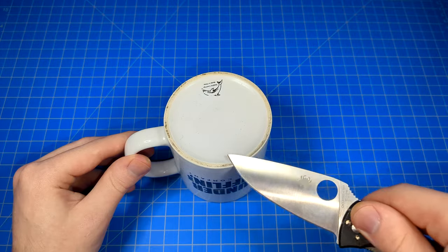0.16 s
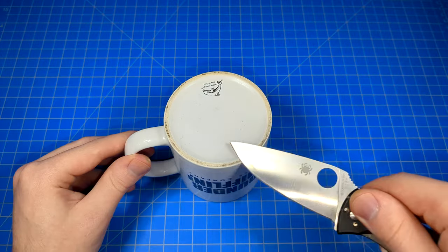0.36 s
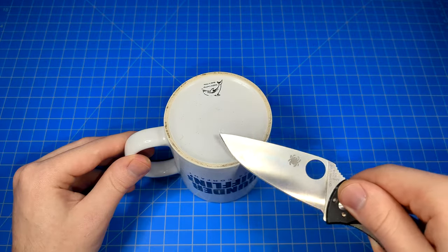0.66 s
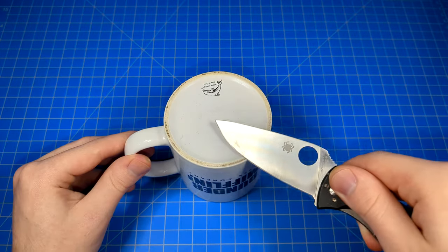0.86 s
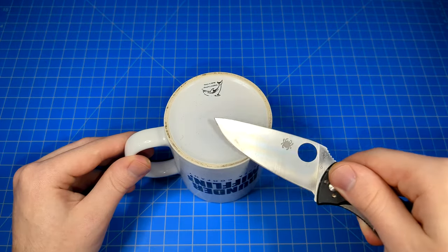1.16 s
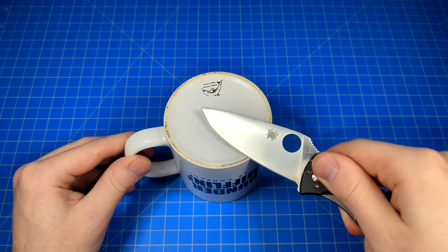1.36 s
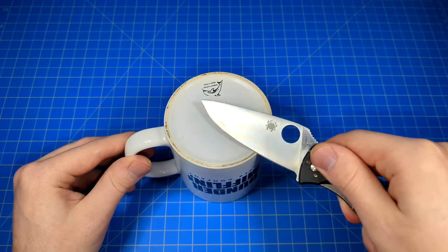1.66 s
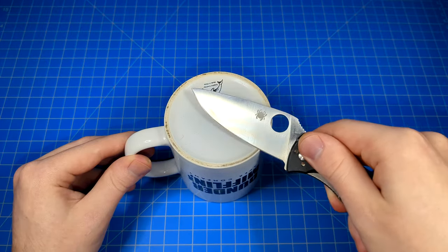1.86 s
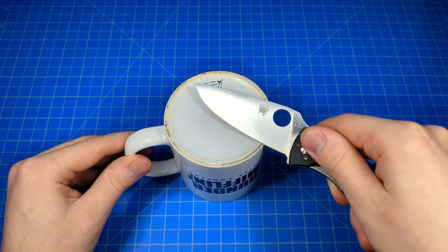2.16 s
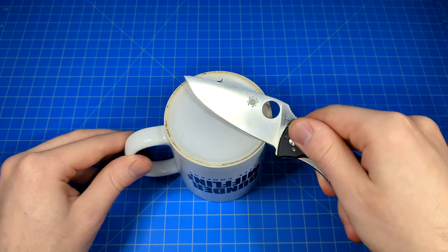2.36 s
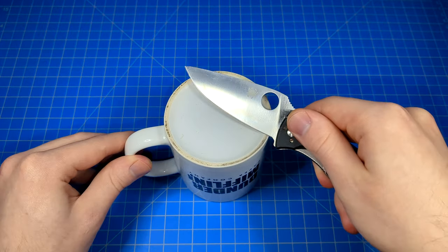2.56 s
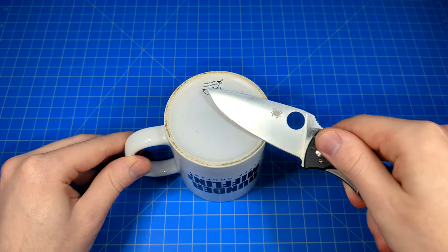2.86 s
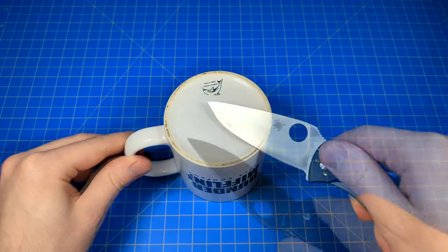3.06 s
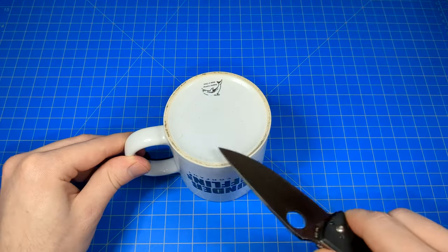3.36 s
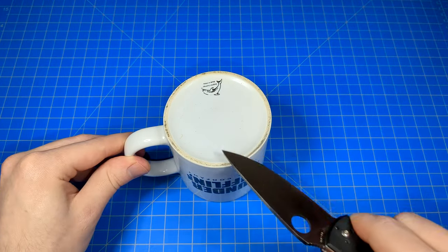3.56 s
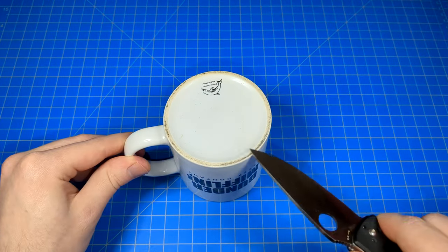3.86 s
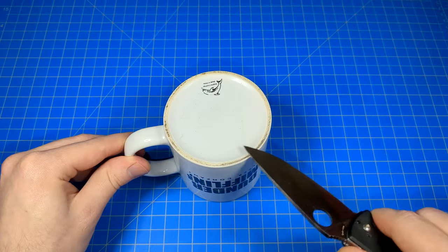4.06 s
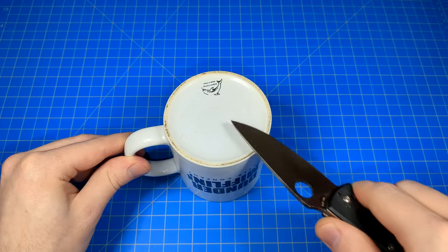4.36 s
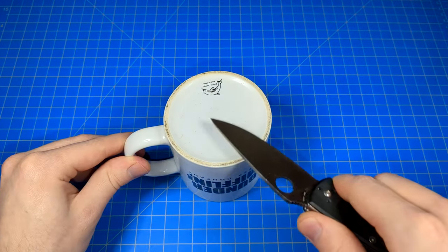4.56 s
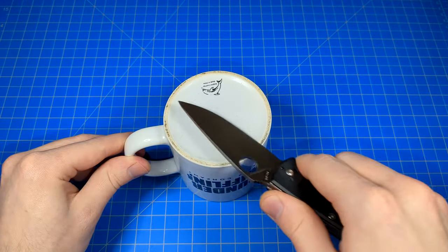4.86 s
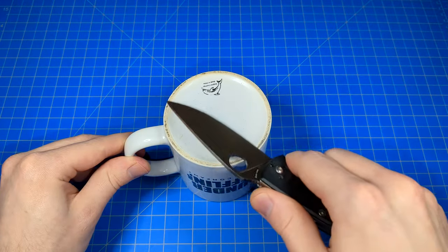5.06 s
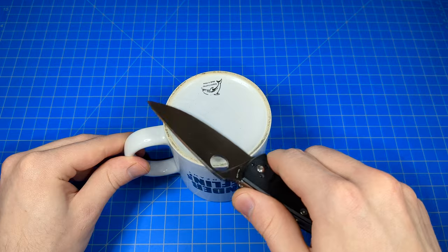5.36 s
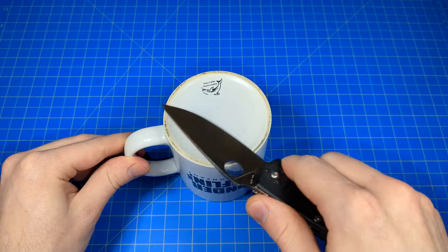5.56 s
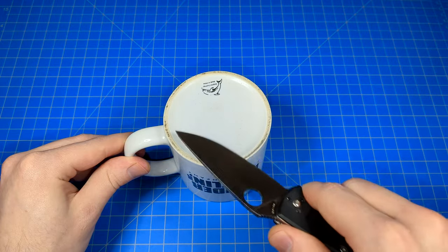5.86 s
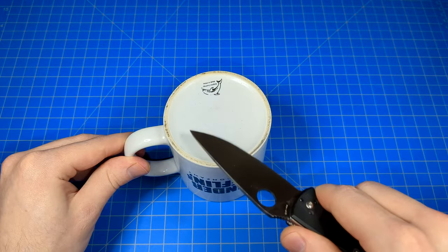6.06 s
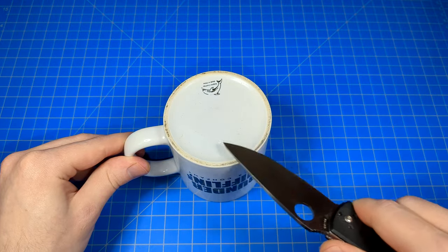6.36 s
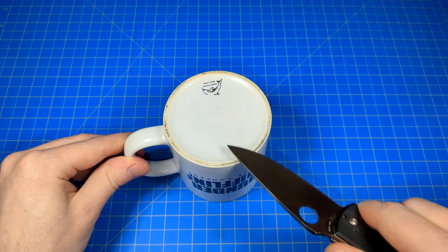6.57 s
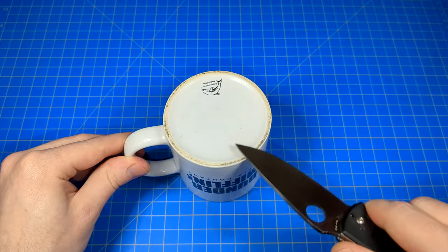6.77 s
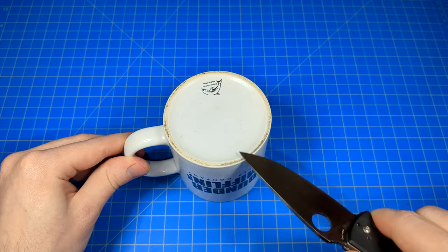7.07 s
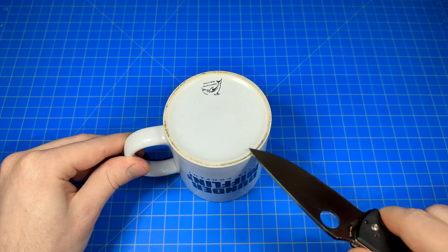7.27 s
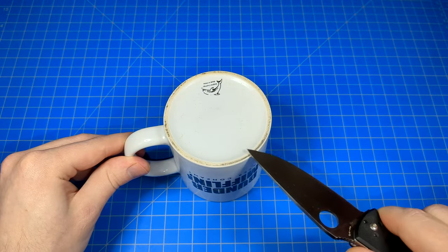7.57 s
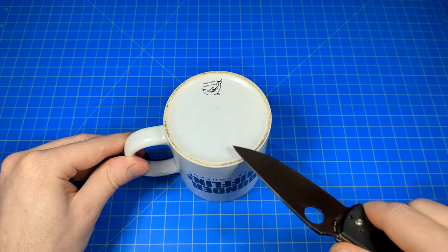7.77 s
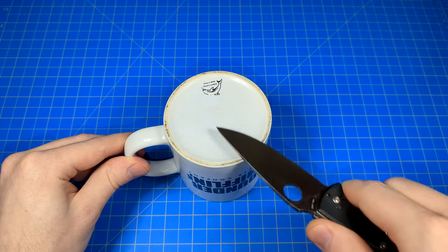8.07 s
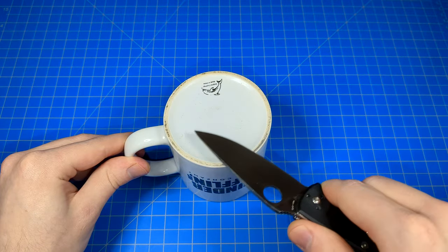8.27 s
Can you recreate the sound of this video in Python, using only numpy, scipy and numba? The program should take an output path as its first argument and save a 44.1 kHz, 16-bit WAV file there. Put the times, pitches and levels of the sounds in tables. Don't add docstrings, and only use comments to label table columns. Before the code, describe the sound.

In a small quiet room, a folding-knife edge is rubbed rapidly to and fro on the unglazed foot of an upturned ceramic mug. Each short stroke gives a gritty hiss and a thin steely ring whose pitch slides as contact moves from tip to heel and back. Halfway the blade is turned over and the scraping gets sharper. Faint desk thuds beneath; close stereo microphone, dry.

```python
import sys
import numpy as np
from scipy import signal
from scipy.fft import rfft, irfft, next_fast_len
from scipy.io import wavfile
from scipy.ndimage import uniform_filter1d, map_coordinates
from numba import njit

SR = 44100
rng = np.random.default_rng(int(sys.argv[2]) if len(sys.argv) > 2 else 0)


def voltage_ratio(level):
    return 10 ** (np.asarray(level, float) / 20)


def wrap_up_sound(samples):
    columns = np.atleast_2d(samples).T
    tamed = np.clip(columns, -1, 1)
    steps = np.round(tamed * 32767).astype(np.int16)
    wavfile.write(sys.argv[1], SR, steps)


N = 371763


def knife_on_mug():
    edge, blade, moving, ringing_db = stroking(slowing_ms=23.9, restart_ms=21.6, widen_ms=0.28)
    louder, higher, swayed = by_stroke(rng.standard_normal((len(STROKES), 3)), glide_ms=23.0)
    coarse = grit(6000, spread_db=2.5, clump_db=1.26)
    fine = grit(15000, spread_db=1.0, clump_db=1.34)
    rasp = coloured(fine, RASP)
    out = blade * blade_ring(coarse, rasp, swayed, ringing_db)
    out += edge * edge_hiss(fine, rasp)
    out += blade_thrum(coarse, fine, moving, louder, higher)
    out += mug(fine * (edge + 0.52 * blade))
    out += desk(fine * moving, swayed)
    return hollowed(out)


# reversal in seconds, slowing in dB, edge hiss in dB, blade ring in dB.
FIRST_PASS = [(0.0, 0, -29.5, -29.5), (0.113, -1, -29.5, -26), (0.227, -12.5, -25.5, -25.5),
              (0.352, -3.5, -25, -19.5), (0.463, -21.5, -31, -25), (0.598, 3, -32, -23.5),
              (0.682, -11, -29.5, -21.5), (0.819, -1.5, -28.5, -21), (0.963, -2.5, -30.5, -23),
              (1.067, 1.5, -29, -19.5), (1.181, -8, -27, -18), (1.281, -7, -27.5, -17.5),
              (1.406, -9, -30.5, -21.5), (1.53, -2, -27, -18.5), (1.654, -11, -29.5, -21),
              (1.81, 1, -31, -29.5), (1.933, -2, -31.5, -26), (2.052, 3.5, -29, -34),
              (2.14, -9, -22.5, -24.5), (2.299, -1.5, -25, -30.5), (2.394, -19.5, -29, -32.5),
              (2.551, 0, -36.5, -36), (2.655, 1, -26.5, -30.5), (2.747, -25, -28, -30.5),
              (2.872, -1, -27.5, -20), (2.963, -8.5, -31, -22.5)]
SECOND_PASS = [(3.127, -9, -26, -19.5), (3.265, -14, -27, -20.5), (3.376, -6.5, -23.5, -19.5),
               (3.512, -20, -23.5, -19.5), (3.632, -5.5, -24.5, -20.5), (3.759, -20, -28, -24.5),
               (3.87, -3.5, -20, -10.5), (3.998, -10, -25.5, -24), (4.097, -10.5, -19, -12.5),
               (4.208, -7.5, -25, -25.5), (4.331, -18.5, -28, -24), (4.454, 2, -25, -18.5),
               (4.568, -27, -26.5, -20.5), (4.673, -6, -23.5, -23.5), (4.813, -22, -30, -27.5),
               (4.921, -0.5, -27, -31.5), (5.042, -17.5, -28, -30.5), (5.156, -8, -30, -30),
               (5.282, -25, -36.5, -38), (5.377, -13.5, -36, -36), (5.49, 0, -25, -30.5),
               (5.6, -10, -30.5, -38), (5.727, -1, -26, -24.5)]
THIRD_PASS = [(5.839, -34, -27, -29.5), (5.966, -3, -27.5, -22.5), (6.078, -14.5, -27.5, -27.5),
              (6.178, -5.5, -23.5, -14.5), (6.315, -25.5, -28.5, -22.5), (6.441, -6, -20, -18),
              (6.538, -13.5, -26, -20), (6.614, 2, -27, -27), (6.692, 6, -27, -18),
              (6.777, -8.5, -19.5, -17), (6.902, -8, -21, -15.5), (7.022, -8.5, -22, -16.5),
              (7.146, -7, -21.5, -17), (7.252, -15, -22.5, -14.5), (7.372, -18.5, -25.5, -21),
              (7.464, -6, -29, -21), (7.581, -28, -26.5, -19.5), (7.685, -8.5, -26.5, -24.5),
              (7.797, -13.5, -23.5, -23.5), (7.922, -4, -23.5, -16.5), (8.034, -30, -25.5, -18.5),
              (8.155, 0, -27.5, -28), (8.272, -9, -26.5, -26.5), (8.392, -5, -18.5, -23.5)]
STROKES = FIRST_PASS + SECOND_PASS + THIRD_PASS


def stroking(slowing_ms, restart_ms, widen_ms):
    turns, slow_db, *levels_db = np.transpose(STROKES)
    t = np.arange(N) / SR
    halfway = (turns + np.append(turns[1:], N / SR)) / 2
    nearest = np.minimum(np.searchsorted(halfway, t), len(turns) - 1)
    since = t - turns[nearest]
    sharpness = np.where(since < 0, 1.5, 3.0)
    thrum_stop_db = -14 + 0.2 * slow_db
    dips = []
    for depth_db in (slow_db, thrum_stop_db):
        here_db = depth_db[nearest]
        reach = np.where(since < 0, slowing_ms - widen_ms * here_db, restart_ms) / 1000
        dips.append(here_db * np.exp(-np.abs(since / reach) ** sharpness))
    edge_db, blade_db = (np.interp(t, halfway, v) for v in levels_db)
    return voltage_ratio(edge_db + dips[0]), voltage_ratio(blade_db + dips[0]), voltage_ratio(dips[1]), blade_db - edge_db


def by_stroke(table, glide_ms):
    stroke = np.searchsorted(np.transpose(STROKES)[0], np.arange(N) / SR, "right") - 1
    rows = np.array(table, float)[np.clip(stroke, 0, len(table) - 1)]
    return uniform_filter1d(rows, int(glide_ms * SR / 1000), axis=0, mode="nearest").T


def to_and_fro():
    turns = np.transpose(STROKES)[0]
    return -np.cos(np.pi * np.interp(np.arange(N) / SR, turns, np.arange(len(turns))))


# time in seconds, place from 0 (tip) to 1 (heel).
CONTACT = [(0, 0.07), (.5, 0.14), (1.5, 0.35), (1.85, 0.32), (2.2, 0.95), (2.8, 0.81), (2.95, 0.34),
           (3.15, 0.4), (3.7, .05), (4.3, 0), (4.7, 0.75), (5, 0.99), (5.8, 0.81), (6.2, 0.45),
           (6.6, 0.068), (7.9, 0), (8.2, 0.88)]


def along_blade():
    return np.clip(in_time(CONTACT)[0], 0, 1)


def grit(per_s, spread_db, clump_db):
    signs = np.sign(rng.random((2, N)) - 0.5)
    sizes = voltage_ratio(spread_db * np.minimum(rng.exponential(1, (2, N)), 5)) * signs
    snags = sizes * (rng.random((2, N)) < per_s / SR)
    clumps = voltage_ratio(clump_db * (slow_steps(35) + 1.15 * slow_steps(117)))
    return rms_one(snags * held(clumps))


# frequency in Hz, level in dB per Hz.
RASP = [(620, -67), (1050, -15.5), (1940, -2), (2220, -8), (2570, -14), (3830, -2), (5560, -12.5),
        (6090, -2), (10400, -5), (12000, 2.5), (13900, -12.5), (15800, -2)]
# frequency in Hz, width in Hz, level in dB.
BLADE = [
    [(1970, 89, -1.5), (2700, 100, -0.5), (3710, 32, -0.5), (4435, 50, -4.5), (5100, 170, -4.5)],
    [(1230, 80, -75), (1909, 47, 8.5), (2930, 540, -14), (3444, 69, 5.5), (5110, 190, -11.5),
     (4960, 30, -12)],
    [(1980, 26, 6), (2389, 20, 6), (2633, 150, 2.5), (3735, 133, -2.0), (4630, 240, -21.5),
     (5470, 200, -7)] + [(1362, 155, -2.5)],
    [(1670, 40, 1.5), (2000, 210, -2), (2628, 54, 7.5), (3870, 980, -18), (4650, 160, -6.5),
     (5130, 710, -2.5)],
]
# time in seconds, frequency in Hz.
SWAY = [(0, 1750), (.6, 1726), (1.5, 1950), (2.4, 1610), (3.1, 1850), (3.55, 1397), (3.8, 1940),
        (4.15, 1960), (4.25, 1380), (4.6, 1870), (5.4, 1580), (6, 1870), (6.45, 1470), (6.9, 2030),
        (7.4, 1975), (7.7, 1496), (8.1, 1740), (8.3, 1940)]
# time in seconds, frequency in Hz.
FLEX = [(0, 4100), (.2, 4100), (.27, 4570), (.42, 3430), (.43, 2680), (1.45, 2870), (1.62, 2730),
        (3.12, 2716), (3.14, 3840), (4, 3727), (6.7, 3757), (7, 3870), (7.65, 3970), (7.75, 3760),
        (8.15, 3730), (8.3, 3490)]


def blade_ring(coarse, rasp, swayed, ringing_db):
    minor = crowd(rasp, 1164, 5060, sharp=15, patchy_db=3.5, count=8)
    ring = standing(coarse, BLADE, minor, bed_db=-8, wander=0.02, patchy_db=3.5)
    sway_hz = in_time(SWAY)[0] * (1 + 0.047 * swayed)
    ring = mix(ring, sliding(coarse, sway_hz, 205), -8.5)
    flex_hz = in_time(FLEX)[0] * (1 + 0.02 * to_and_fro())
    flex = sliding(coarse, flex_hz * (1 + 0.016 * drift(7.5)), 294)
    flex_db = -6.5 + 0.54 * ringing_db + 2 * along_blade()
    return mix(band(ring, 1120, 6540), flex, flex_db)


# frequency in Hz, width in Hz, level in dB.
EDGE = [
    [(6280, 150, -13.5), (7650, 230, 0), (9000, 130, 5), (9610, 44, 2.5)],
    [(6080, 97, 0), (7630, 29, -25), (8820, 72, -8), (10000, 42, -7)],
    [(5960, 31, 16), (5963, 630, 8), (8160, 73, -8), (7670, 200, -12.5)],
    [(6320, 320, -1.2), (7760, 150, -1.3), (8760, 110, 0.72)],
]
# time in seconds, frequency in Hz.
WHISTLE = [(0, 12200), (.9, 11920), (1.45, 12270), (1.62, 12600), (1.85, 12510), (3.1, 12600), (3.9, 11570),
           (4.3, 11180), (4.62, 12800), (4.75, 11900), (5.1, 12400), (5.3, 11900), (5.7, 12300),
           (5.85, 11400), (6.1, 12700), (6.5, 11700), (7.5, 11620), (8.25, 12400)]


def edge_hiss(fine, rasp):
    minor = crowd(rasp, 4500, 16600, sharp=22, patchy_db=2.5, count=18)
    hiss = standing(fine, EDGE, minor, bed_db=5.5, wander=0.0059, patchy_db=5.5)
    whistle_hz = in_time(WHISTLE)[0] * (1 + 0.01 * drift(12))
    whistle = sliding(fine, whistle_hz, 520) * voltage_ratio(3 * drift(12))
    tip_db, heel_db = -8.5, -2.5
    whistle_db = tip_db + (heel_db - tip_db) * np.sqrt(along_blade())
    return mix(band(hiss, 3250, 21000), whistle, whistle_db)


# time in seconds, frequency in Hz, level in dB, push in dB.
THRUM = [(0, 770, -41.5, -12), (.9, 776, -37.5, 13), (1.4, 513, -40.5, 6), (1.9, 372, -40, 12),
         (2.55, 290, -38, 25), (2.85, 328, -33.5, 19.5), (3.08, 409, -37, 8), (3.16, 664, -40.5, 4),
         (4.05, 762, -32, 0), (4.4, 704, -30.5, 8), (4.75, 390, -41, 11), (5.25, 282, -28.5, 19.5),
         (5.65, 306, -37.5, 11.5), (6.0, 454, -42.5, 4), (6.25, 646, -34.5, 12), (7.0, 753, -35, -3),
         (7.95, 734, -36.5, 8), (8.35, 517, -41, 6.5)]


def blade_thrum(coarse, fine, moving, louder, higher):
    hz, level_db, _ = in_time(THRUM)
    level = moving * voltage_ratio(level_db + 1.5 * louder)
    hz = hz * (1 + 0.038 * higher)
    tip_hz, heel_hz = 730, 290
    middle = np.sin(np.pi * np.clip((hz - heel_hz) / (tip_hz - heel_hz), 0, 1)) ** 2
    hz = hz * (1 + 0.2 * middle * to_and_fro())
    tone = sliding(coarse, hz * (1 + 0.02 * drift(11.6)), 64)
    broad = rms_one(band(band(fine, 609, 875), 240, 1450)) * voltage_ratio(2.64 * drift(10))
    return level * mix(tone, broad, -18 + 17.2 * np.sqrt(along_blade()))


# frequency in Hz, width in Hz, level in dB.
MUG = [(2368, 14.6, -12.5), (7980, 2.8, -26)]


def mug(rubbing):
    return sum(voltage_ratio(db) * 10 * resonance(rubbing, hz, width) for hz, width, db in MUG)


# frequency in Hz, width in Hz, level in dB.
DESK = [(127.8, 27.6, -51.5), (97.5, 35.6, -55.5), (296.3, 21, -58)]


def desk(rubbing, swayed):
    heel = along_blade()
    push_db = in_time(THRUM)[2]
    out = 0
    for hz, width, db in DESK:
        thud = resonance(resonance(rubbing, hz, width * 1.6), hz, width * 1.6)
        shake_db = 3.6 * heel if hz < 200 else push_db + 2.3 * swayed
        out = out + voltage_ratio(db + shake_db) * rms_one(thud)
    return out


# frequency in Hz, width in Hz, depth from 0 to 1.
HOLLOWS = [(1030, 295, 1), (2288, 62, 1), (5440, 74, 1), (13960, 300, 0.6)]


def hollowed(x):
    for hz, width, depth in HOLLOWS:
        x = x - np.clip(depth, 0, 1) * resonance(x, hz, width)
    return x


def standing(x, sets, bed, bed_db, wander, patchy_db):
    heel = along_blade()
    second = np.clip((np.arange(N) / SR - 3.13) / 0.022, 0, 1)
    shares = [(1 - heel) * (1 - second), heel * (1 - second), (1 - heel) * second, heel * second]
    out = voltage_ratio(bed_db) * rms_one(bed)
    for modes, share in zip(sets, shares):
        rung = 0
        for k, (hz, width, db) in enumerate(modes):
            rung = rung + (-1) ** k * voltage_ratio(db) * wandering(x, hz, width, wander, patchy_db)
        out = out + np.sqrt(share) * rms_one(rung)
    return rms_one(out)


def crowd(x, low_hz, high_hz, sharp, patchy_db, count):
    pitches = np.linspace(low_hz, high_hz, count)
    return sum((-1) ** k * wandering(x, hz, 100 + hz / sharp, 0.032, patchy_db) for k, hz in enumerate(pitches))


def wandering(x, hz, width_hz, wander, patchy_db):
    r = np.exp(-np.pi * max(width_hz, 8) / SR)
    cosine = held(np.cos(2 * np.pi * hz * (1 + wander * slow_steps(2.42)) / SR))
    drive = held((1 - r * r) * voltage_ratio(patchy_db * slow_steps(4.05)))
    return drive * slide(x, cosine, r)


def sliding(x, hz, width_hz):
    cosine, r = np.cos(2 * np.pi * hz / SR), np.exp(-np.pi * width_hz / SR)
    return rms_one(slide(slide(x, cosine, r), cosine, r))


@njit
def slide(x, cosine, r):
    y = np.zeros_like(x)
    for c in range(x.shape[0]):
        for i in range(2, x.shape[1]):
            driven = x[c, i] - x[c, i - 2]
            y[c, i] = driven + 2 * r * cosine[i] * y[c, i - 1] - r * r * y[c, i - 2]
    return y


def resonance(x, hz, width_hz):
    r = np.exp(-np.pi * max(width_hz, 8) / SR)
    b = np.array([1, 0, -1]) * (1 - r * r) / 2
    return signal.lfilter(b, [1, -2 * r * np.cos(2 * np.pi * hz / SR), r * r], x)


def mix(fixed, moving, share_db):
    share = np.clip(voltage_ratio(share_db), 0, 0.99)
    return np.sqrt(1 - share ** 2) * fixed + share * moving


def band(x, low_hz, high_hz):
    return signal.sosfilt(signal.butter(2, [low_hz, high_hz], "band", fs=SR, output="sos"), x)


def coloured(x, points, scale=1):
    hz, level_db = np.transpose(points)
    size = next_fast_len(N)
    grid = np.log(np.arange(size // 2 + 1) * SR / size + 1)
    gain = voltage_ratio(scale * np.interp(grid, np.log(hz), level_db))
    return irfft(rfft(x, size) * gain, size)[..., :N]


def rms_one(x):
    return x / np.sqrt(np.mean(x ** 2) + 1e-20)


def in_time(rows):
    s, *columns = np.transpose(rows)
    return [np.interp(np.arange(N) / SR, s, c) for c in columns]


def slow_steps(rate):
    r = np.exp(-64 * np.pi * rate / SR)
    noise = rng.standard_normal(N // 32 + 1501)
    return rms_one(signal.lfilter([1], [1, -2 * r, r * r], noise)[1500:])


def held(steps):
    return np.repeat(steps, 32)[:N]


def drift(rate):
    return held(slow_steps(rate))


def glancing(x, delay_ms, sway_ms):
    late = uniform_filter1d(np.abs(delay_ms + sway_ms * drift(1.56)), size=128) * SR / 1000
    return map_coordinates(x, [np.arange(N) - late], order=2)


# frequency in Hz, likeness from 0 to 1.
LIKENESS = [(60, 0.62), (180, 1), (550, 0.53), (1650, 0.86), (4970, 0.48), (15000, 0.12)]
# frequency in Hz, left minus right in dB.
LEAN = [(60, 0), (180, -3.5), (550, -3.5), (1650, -0.5), (4970, 1), (15000, -0.5)]


def two_ports(alike, opposite):
    side_db = [(hz, 10 * np.log10((1.001 - min(c, 1)) / (1 + c))) for hz, c in LIKENESS]
    echoes = 0.4 * glancing(alike, 0.3416, 0.066) - 0.86 * glancing(alike, 0.911, 0.098)
    side = coloured(echoes + 0.22 * opposite, side_db)
    left = coloured(alike + side, LEAN, scale=1)
    right = coloured(alike - side, LEAN, scale=-0.28)
    return np.array([left, right])


def room(x, t60_s):
    size = next_fast_len(N + SR)
    hz = np.arange(size // 2 + 1) * SR / size
    spectrum, out = rfft(x, size), np.zeros((2, len(hz)), complex)
    for k, lag in enumerate(rng.uniform(0.0067, 0.029, 8)):
        loop = voltage_ratio(-60 * lag / t60_s * (0.5 + hz / 8000)) * np.exp(-2j * np.pi * hz * lag)
        out[k % 2] += spectrum * loop / (1 - loop)
    return irfft(out, size)[:, :N]


def quiet_air():
    return coloured(rng.standard_normal((2, N)), [(30, 18), (300, -1.5), (2000, 8), (16000, -1)])


def scene():
    alike, opposite = knife_on_mug()
    return two_ports(alike, opposite) + voltage_ratio(-22) * room(alike, t60_s=0.31) + voltage_ratio(-49) * quiet_air()


def roll_off(x):
    return signal.sosfilt(signal.butter(12, 15940, fs=SR, output="sos"), x)


def record(dry):
    x = signal.sosfilt(signal.butter(2, 60, "high", fs=SR, output="sos"), dry)
    x = 0.9 * np.tanh(x / 0.9)
    x = signal.sosfilt(signal.cheby2(16, 60, 16150, fs=SR, output="sos"), x)
    return roll_off(x)


dry = scene()
out = record(dry)
wrap_up_sound(out)
```